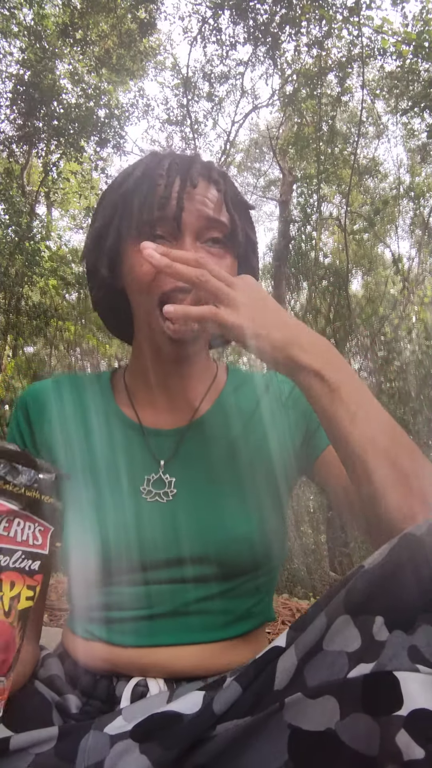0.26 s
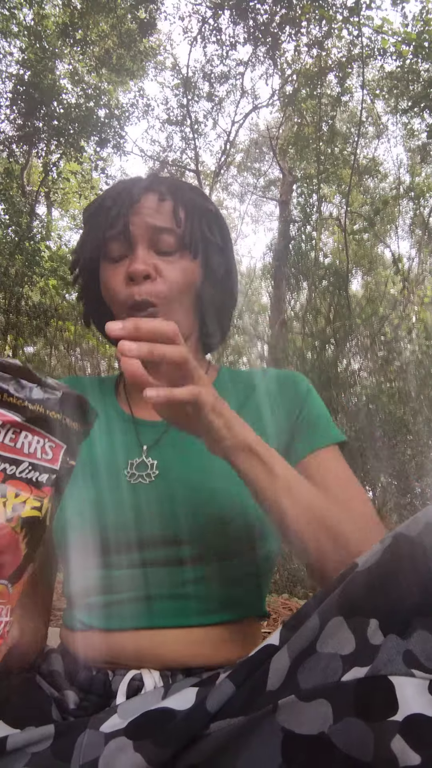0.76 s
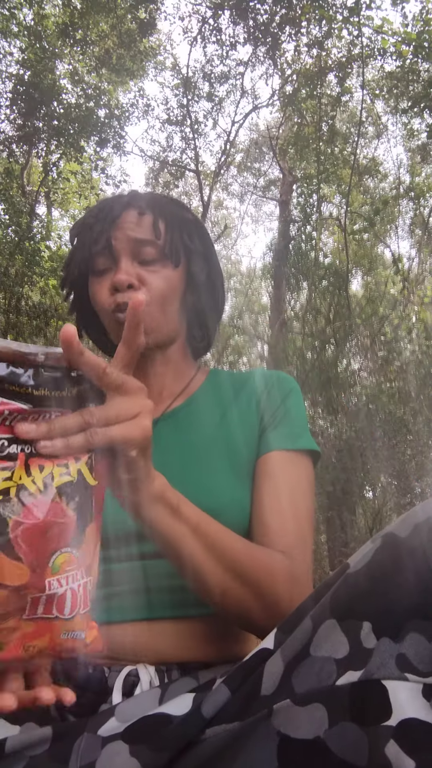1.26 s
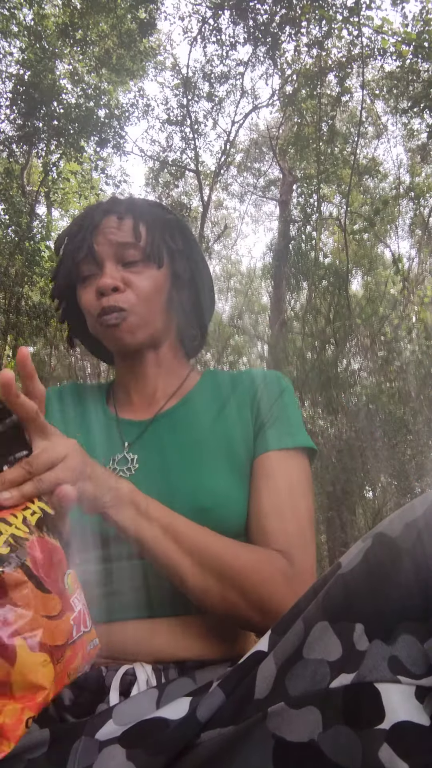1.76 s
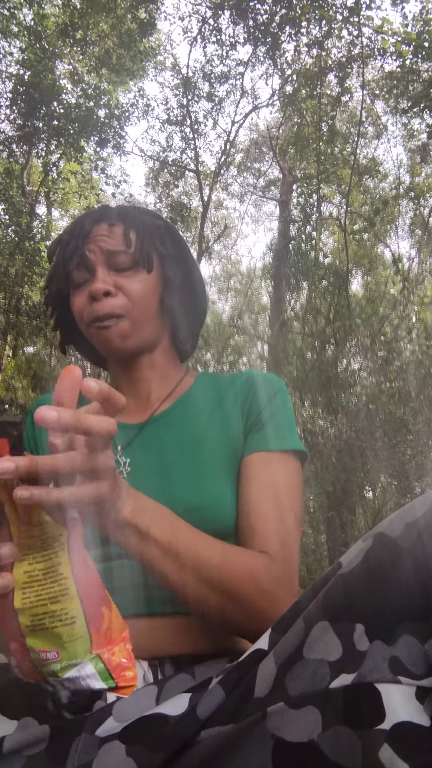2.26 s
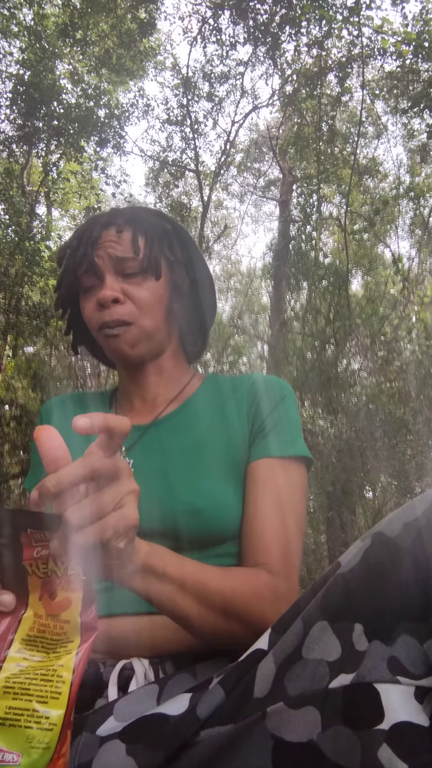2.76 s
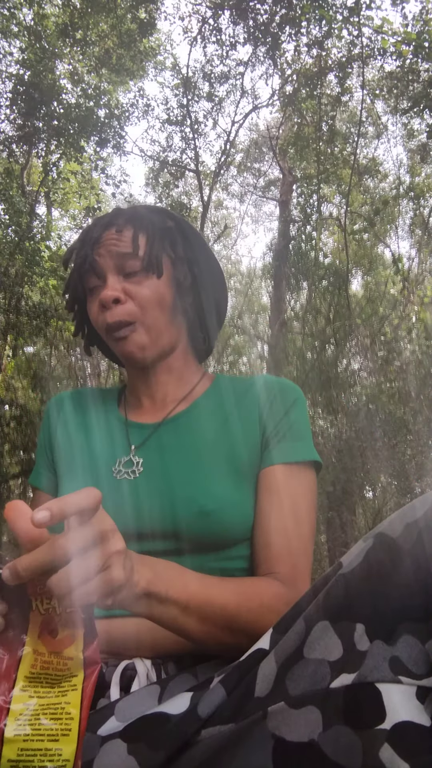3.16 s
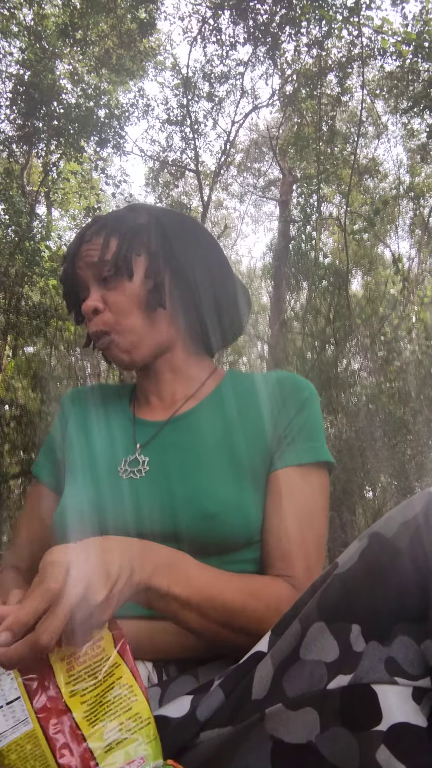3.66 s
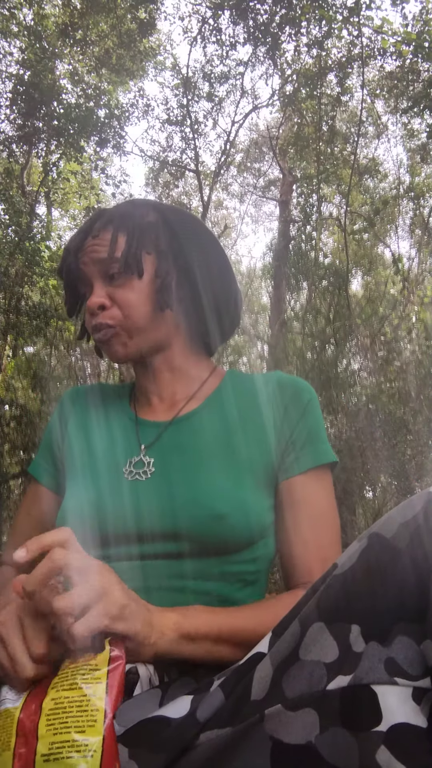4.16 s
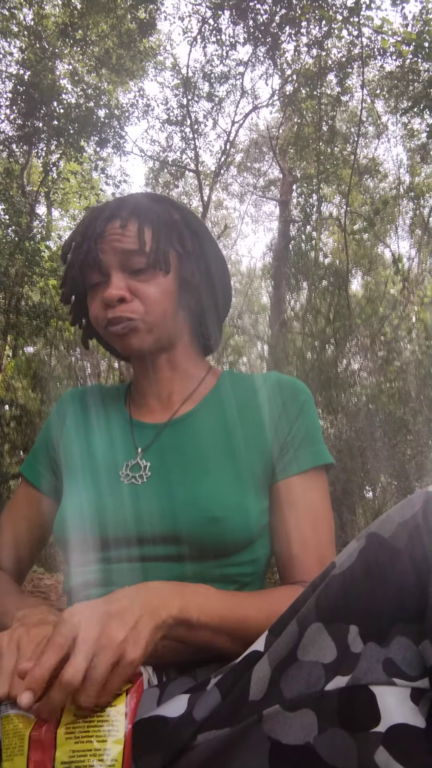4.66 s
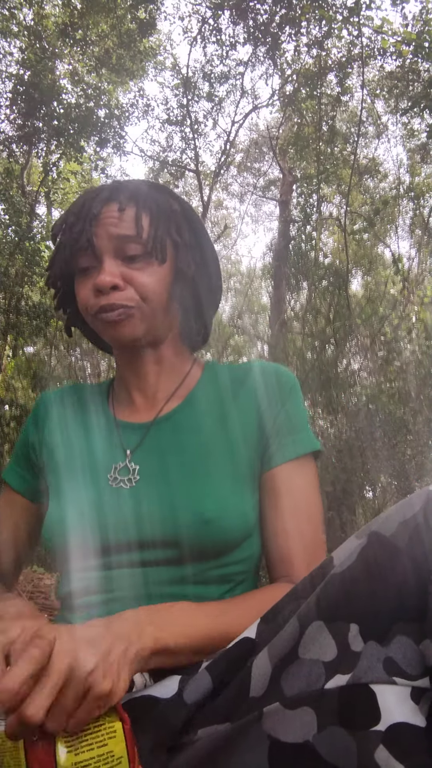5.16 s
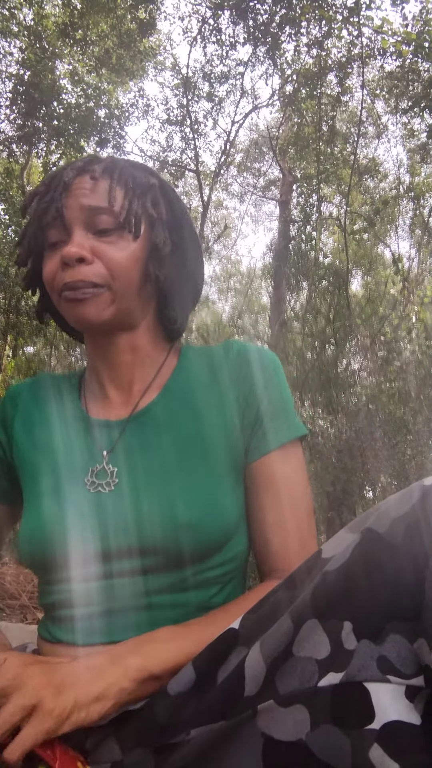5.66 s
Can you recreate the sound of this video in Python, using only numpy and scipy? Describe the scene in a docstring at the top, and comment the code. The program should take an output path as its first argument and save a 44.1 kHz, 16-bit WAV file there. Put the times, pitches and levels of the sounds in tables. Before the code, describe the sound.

A quiet wood with faint low road rumble, a soft hum and an even, dull murmur. From 0 s a far engine drones on a low, wavering tone, dipping and swelling; barely audible ticks come near the start and at 0.65 s. At about 1 s a thin foil snack bag close to the stereo phone begins to stir, and from 1.2 s it crackles sharply: bright snaps with short papery rings over many tiny crinkles. Bursts come irregularly, strong around 1.2-1.4 and 1.6-2.15 s, lighter around 2.2-2.5 s. The engine slides down in pitch, thins near 3 s and is gone by about 3.4 s. Crackling is thick and loud from 3.2 to 4.4 s, brightest around 3.7-4.0, with dull puffs of squeezed air. More puffs and snaps follow to 5.2 s, then somewhat sparser, softer rustling until the cut at about 5.9 s, the bag drifting slightly from right to left.

```python
"""Rummaging in a foil snack bag

A hand turns and rummages in a thin foil snack bag, close to a two-port phone in a wood.
Creases snap as short noise bursts with a treble tick and a panel ring, over many small crinkles;
squeezes add dull puffs of air. Far off an engine, made of wavering sine tones, drones and slows,
over road rumble, hum and an even murmur of the wood, all three made of shaped noise."""
import sys
import numpy as np
from scipy.fft import rfft, irfft, next_fast_len
from scipy.io import wavfile
from scipy.ndimage import map_coordinates

SR = 44100
rng = np.random.default_rng(int(sys.argv[2]) if len(sys.argv) > 2 else 0)


def transcribe(signal):
    """Save signal, clipped to [-1, 1], as a 16-bit WAV file at the path in sys.argv[1]."""
    frames = np.atleast_2d(signal).T
    limited = np.clip(frames, -1, 1)
    pcm = np.round(limited * 32767).astype(np.int16)
    wavfile.write(sys.argv[1], SR, pcm)


N = 260250  # length of the scene in samples
SIZE = 1024  # length of one burst in samples

# The crease snaps that stand out.
# Each row: time in seconds, ring level in dB, ring pitch in Hz, treble level in dB.
SNAPS = [(0.034, -49.5, 3000, -65), (0.0936, -51, 3580, -73), (0.6406, -56, 950, -56.5),
         (0.6483, -55.5, 2090, -59), (0.6584, -54.5, 930, -60), (0.9842, -35.5, 2630, -42.5),
         (1.0843, -37, 950, -53), (1.156, -28.5, 2210, -41), (1.1669, -32, 2190, -43),
         (1.192, -17.5, 2100, -26), (1.2212, -23.5, 2050, -31), (1.2537, -19.5, 2560, -25.5),
         (1.266, -19, 2604, -20), (1.2759, -23.5, 1840, -29.5), (1.3215, -23, 2070, -29.5),
         (1.3326, -25.5, 2080, -34), (1.3537, -25, 930, -22.5), (1.3618, -24, 2010, -24.5),
         (1.4969, -24, 2070, -38), (1.5478, -22, 1830, -32), (1.6132, -25.5, 1120, -27),
         (1.6585, -26.5, 1370, -38), (1.727, -25.5, 2530, -33), (1.7637, -23, 1870, -23),
         (1.7807, -17, 2950, -21), (1.9027, -29.5, 1420, -28.5), (1.917, -20, 2060, -23),
         (1.9287, -21, 2820, -20.5), (1.9355, -34, 1490, -31.5), (2.0631, -39, 1830, -32.5),
         (2.0972, -31.5, 970, -30.5), (2.1157, -21, 1310, -29.5), (2.1262, -23, 1990, -21.5),
         (2.1362, -17, 2610, -17), (2.2228, -30, 2440, -40), (2.3056, -29.5, 1900, -43.5),
         (2.4588, -30, 2940, -47), (2.4903, -31, 1870, -33), (2.518, -28.5, 2080, -33),
         (2.5523, -35, 1930, -32), (2.6013, -27.5, 1900, -26), (2.6153, -25.5, 1230, -24.5),
         (2.686, -30, 2390, -26.5), (2.698, -29.5, 3460, -29), (2.7685, -25, 970, -20),
         (2.802, -24, 2750, -25), (2.8237, -31, 2350, -27.5), (2.8359, -31, 3790, -26),
         (2.8467, -27.5, 1290, -29), (2.8882, -29.5, 1370, -35), (2.9261, -25, 2860, -31),
         (2.9508, -27.5, 1340, -33), (2.9777, -34, 2770, -37.5), (3.043, -35.5, 2230, -38),
         (3.173, -22.5, 2700, -25.5), (3.2137, -22.5, 1200, -33), (3.238, -20, 2930, -28.5),
         (3.2653, -24.5, 1290, -24.5), (3.2968, -22.5, 2630, -24), (3.377, -19.5, 2720, -21),
         (3.4153, -24.5, 2930, -32.5), (3.5672, -29, 1240, -34.5), (3.6504, -22.5, 1290, -27),
         (3.6607, -21.5, 1450, -23.5), (3.69, -19, 2370, -24), (3.7046, -28, 3400, -17),
         (3.7149, -20, 2610, -23), (3.7365, -39, 1720, -25), (3.8089, -19, 2960, -15.5),
         (3.8274, -22, 2840, -24), (3.8584, -24.5, 2370, -21.5), (3.8722, -22.5, 1410, -23.5),
         (3.9003, -35, 2860, -48), (3.92, -31, 1770, -19), (3.9306, -21.5, 2770, -20.5),
         (3.9408, -31, 1880, -25), (3.957, -26, 3510, -30), (3.9956, -21.5, 890, -14.5),
         (4.008, -16, 1520, -15), (4.0265, -22, 1450, -20.5), (4.1152, -28.5, 1630, -34),
         (4.1288, -33, 2640, -28), (4.183, -33, 2790, -33), (4.2163, -34, 1750, -29.5),
         (4.2382, -36, 1250, -28), (4.2681, -20.5, 2200, -20), (4.2882, -25, 2430, -23),
         (4.323, -29, 1510, -23.5), (4.3412, -15.5, 1540, -15), (4.371, -25.5, 1470, -27),
         (4.3842, -25.5, 1430, -25), (4.452, -27.5, 1050, -31.5), (4.545, -24.5, 2450, -27.5),
         (4.5523, -23.5, 2360, -29), (4.5622, -24, 1300, -20), (4.5764, -21, 2170, -32),
         (4.6357, -25.5, 2730, -22), (4.6476, -31, 1820, -20), (4.668, -31, 3040, -25.5),
         (4.7385, -22.5, 2800, -31), (4.7602, -23.5, 920, -25.5), (4.7933, -25.5, 980, -27),
         (4.8008, -27.5, 2990, -24), (4.8263, -19, 1720, -21), (4.849, -24, 1670, -25.5),
         (4.859, -33, 900, -27), (4.8957, -32.5, 920, -31.5), (4.913, -28.5, 1900, -37),
         (5.0077, -33.5, 2690, -21), (5.0271, -28.5, 1920, -26.5), (5.0437, -25, 930, -28),
         (5.062, -34, 2420, -32.5), (5.0938, -29, 1310, -31.5), (5.1673, -29.5, 1690, -34),
         (5.178, -31, 2680, -28.5), (5.2046, -22, 1720, -22.5), (5.216, -26.5, 1480, -25),
         (5.237, -32, 1320, -36.5), (5.276, -28, 2820, -30.5), (5.3119, -28, 1640, -27.5),
         (5.328, -30.5, 1520, -32), (5.456, -31.5, 1760, -44), (5.5454, -31.5, 1880, -33.5),
         (5.5893, -32, 1750, -39), (5.6051, -29, 2610, -26), (5.6168, -34, 1030, -32),
         (5.6318, -35.5, 1430, -34), (5.7728, -27, 1690, -26), (5.8224, -28, 1390, -29.5),
         (5.8632, -27.5, 2760, -25), (5.8717, -32, 1390, -31)]
# Where the bag is and how it faces. Each row: time in seconds, usual lag of the left port in seconds,
# top-octave lift in dB, then the usual crinkle treble and bag-air levels in dB at a firm grip.
PLACE = [(1, .00012, 0.5, -52.5, -55.5), (2.2, .00003, 1, -50, -57), (3, -.00006, -3.5, -47.5, -57.5),
         (3.7, -.0001, -1, -46.5, -58), (4.2, -.00011, -3.5, -42, -53.5), (4.8, -.00013, -7, -45.5, -51),
         (5.9, -.00015, -1.5, -42, -53.5)]


def amp(db):
    """Turn dB into gain."""
    return 10 ** (np.asarray(db) / 20)


def unit(x):
    """Scale x to an rms of 1."""
    return x / np.sqrt(np.mean(x ** 2) + 1e-20)


def along(points, hz):
    """Read a curve of (Hz, value) points on a log frequency axis."""
    point_hz, value = np.transpose(points)
    return np.interp(np.log(hz + 1), np.log(point_hz + 1), value)


def curves(rows, times=None):
    """Read each column after the time, at every sample or at given times."""
    row_times, *columns = np.transpose(rows)
    if times is None:
        times = np.arange(N) / SR
    return [np.interp(times, row_times, column) for column in columns]


def wobble(rate):
    """A smooth random curve through `rate` random points a second."""
    knots = rng.standard_normal(int(N * rate / SR) + 4)
    return map_coordinates(knots, [np.arange(N) * rate / SR])


def filtered(x, response):
    """Multiply the spectrum of x by a response that depends on frequency."""
    m = next_fast_len(N + SR // 2)
    hz = np.fft.rfftfreq(m, 1 / SR)
    return irfft(rfft(x, m) * response(hz), m)[..., :N]


def rush(spectrum):
    """Stereo noise of rms 1: left and right are alike in the bass and mostly unlike higher up."""
    # Each row: frequency in Hz, left-right likeness (1 is the same, 0 is unrelated).
    alike = [(60, 1), (180, 1), (550, 0.43), (1650, 0.049), (4970, 0.27), (15000, -0.6)]

    def response(hz):
        turn = np.arccos(np.clip(along(alike, hz), -1, 1)) / 2
        return amp(along(spectrum, hz)) * [np.cos(turn), np.sin(turn)]

    mid, side = filtered(rng.standard_normal((2, N)), response)
    return unit(np.array([mid + side, mid - side]))


def road():
    """Far traffic rumbles and hums with slow level wobbles; the wood murmurs evenly."""
    # Traffic levels. Each row: time in seconds, usual rumble level in dB, usual hum level in dB.
    traffic = [(0, -46.5, -47.5), (1, -45, -50.5), (2, -47, -48.5), (3.3, -43.5, -45.5), (4.5, -42.5, -49),
               (5.9, -44.5, -50)]
    # Noise colours of rumble, hum and wood. Each row: frequency in Hz, relative level in dB per Hz.
    rumble_colour = [(20, -41), (40, -13), (60, 7), (85, 12.5), (120, 12.5), (160, 2.5), (250, -43.5)]
    hum_colour = [(90, -11), (150, 10.5), (200, 4), (320, 2.5), (450, -51)]
    wood_colour = [(210, -24.5), (350, 0.5), (650, -5), (1250, -10.5), (2500, -22.5), (3500, -32.5),
                   (5000, -42), (9000, -52.5), (16000, -49)]
    rumble_db, hum_db = curves(traffic)
    rumble = amp(rumble_db + 0.83 * wobble(3.4)) * rush(rumble_colour)
    hum = amp(hum_db + 1.5 * wobble(3.11)) * rush(hum_colour)
    return rumble + hum + amp(-54.0) * rush(wood_colour)


def engine():
    """The firing tone swells and fades on its way through the trees; weak orders lie above it."""
    # Engine speed. Each row: time in seconds, firing rate in Hz.
    speed = [(0, 128.3), (.7, 120.5), (1.1, 123.9), (2.05, 123.5), (2.3, 116.9), (2.75, 110.6), (3, 100),
             (3.4, 104.2)]
    # Loudness of the firing tone. Each row: time in seconds, usual level in dB.
    loudness = [(0, -27.5), (.3, -28.5), (.7, -34.5), (1, -38), (1.2, -44.5), (1.55, -37), (2, -36.5),
                (2.3, -33.5), (2.75, -34), (2.95, -45), (3.15, -39.5), (3.4, -62)]
    # The tone dips briefly. Each row: time in seconds, depth in dB, width in seconds.
    dips = [(.355, 17, 0.023), (.61, 7, 0.05), (0.811, 32, .03), (1.15, 13, 0.075), (1.65, 8, .03),
            (1.78, 7, 0.034), (2.14, 12, .05), (2.29, 9, .02), (2.83, 18, 0.018)]
    # Weaker tones. Each row: multiple of the firing rate, usual level in dB.
    orders = [(1.5, -57), (2, -60), (2.5, -59)]
    t = np.arange(N) / SR
    firing_hz, = curves(speed)
    level_db, = curves(loudness)
    for dip_time, depth_db, width in dips:
        level_db = level_db - depth_db * np.exp(-((t - dip_time) / width) ** 2)
    phase = 2 * np.pi * np.cumsum(firing_hz) / SR
    tone = amp(level_db + 1.5 * wobble(24.89)) * np.sin(phase + 0.35 * wobble(30))
    for multiple, order_db in orders:
        tone += amp(order_db + 2.8 * wobble(8)) * np.sin(multiple * phase + 1.35 * wobble(14))
    # fade to silence over 0.25 s around the last level row
    fade_out = np.clip((loudness[-1][0] + 0.23 - t) / 0.25, 0, 1)
    left_right = amp([[.45], [-.45]])
    return np.sqrt(2) * fade_out * tone * left_right


def bursts(times, db, pan_db, colour_db, t60, unlike, travel=0.0537):
    """Short stereo noise bursts that fade by 60 dB in t60 seconds; `unlike` is the unshared part."""
    t, hz = np.arange(SIZE // 2) / SR, np.fft.rfftfreq(SIZE, 1 / SR)
    noise = rng.standard_normal((len(times), 3, len(t)))  # one shared, one left, one right
    pair = np.sqrt(1 - unlike) * noise[:, :1] + np.sqrt(unlike) * noise[:, 1:]
    rise = (1 - np.exp(-t / (0.11 * t60))) ** 2
    shape = amp(-60 * t / t60) * rise
    # bending waves in the foil run at a speed rising with the root of frequency:
    # the treble arrives first, each frequency after travel / sqrt(hz) seconds
    bend = 4 * np.pi * travel * np.sqrt(hz)
    # each burst sits elsewhere on the bag, so its lag between the ports differs a little
    left_lag = curves(PLACE, times)[0] + .000025 * rng.standard_normal(len(times))
    # 64 spare samples keep every delay positive; they are taken off again below
    delay = np.multiply.outer(left_lag, [.5, -.5])[..., None] + 64 / SR
    turn = np.exp(-1j * (bend + 2 * np.pi * hz * delay))
    sound = irfft(rfft(pair * shape, SIZE) * amp(colour_db)[..., None, :] * turn, SIZE)
    # bring all bursts to the same energy, then set level and left-right balance
    energy = np.sum(sound ** 2, axis=(1, 2))
    sound /= np.sqrt(energy / (t60 * SR / 2))[:, None, None]
    sound *= amp(db[:, None] + np.multiply.outer(pan_db, [.5, -.5]))[..., None]
    # add every burst into the scene at its own time
    start = np.round(times * SR).astype(int)[:, None] - 64
    place = (start + np.arange(SIZE)).clip(0).ravel()
    return np.array([np.bincount(place, sound[:, ear].ravel(), N + SIZE)[:N] for ear in range(2)])


def puffs(times, db):
    """Short dull pushes of the air in the bag, 2 dB stronger on the left."""
    # Colour of the bag's air. Each row: frequency in Hz, relative level in dB per Hz.
    air_colour = [(150, -3), (300, -3.5), (480, 6), (750, -4.5), (1200, -61)]
    colour_db = along(air_colour, np.fft.rfftfreq(SIZE, 1 / SR))
    return bursts(times, db, 2 + 0 * times, colour_db, t60=0.049, unlike=0.053)


def creases(times, ring_db, ring_hz, treble_db):
    """A buckling crease gives a treble tick and rings its foil panel, a little to one side or the other."""
    # Colours of the ring and of the tick. Each row: frequency in Hz, relative level in dB per Hz.
    foil_colour = [(410, -22), (700, -13), (963, -2.5), (1260, -3.5), (2910, -1), (3970, -9.5), (4500, -15),
                   (5850, -14), (9900, -120)]
    shine_colour = [(2350, -42), (4000, -3), (4700, 0.5), (7790, 3.5), (10800, -4), (13300, -0.5),
                    (15400, -10.5), (16000, 4.5), (16800, -34)]
    hz = np.fft.rfftfreq(SIZE, 1 / SR)
    pan_db = 0.5 + 3.5 * rng.standard_normal(len(times))
    # the panel adds a peak of 8 dB around its own pitch
    panel_db = 8 * np.exp(-(np.log((hz + 1) / ring_hz[:, None]) / 0.15) ** 2)
    # the way the bag faces lifts or dulls the top octave
    lift_db = np.multiply.outer(curves(PLACE, times)[1], np.clip(hz / 4000 - 2.2, 0, 1))
    # each crease is also duller or brighter by chance, in dB per octave above 4 kHz
    tilt_db = 4.4 * rng.standard_normal(len(times))
    lift_db += np.multiply.outer(tilt_db, np.log2(np.clip(hz, 4000, None) / 8000))
    ring_colour_db = along(foil_colour, hz) + panel_db
    tick_colour_db = along(shine_colour, hz) + lift_db
    ring = bursts(times, ring_db, pan_db, ring_colour_db, t60=0.0094, unlike=0.076)
    tick = bursts(times, treble_db, pan_db, tick_colour_db, t60=0.0058, unlike=.15)
    return ring + tick


def crinkle(count, over_db, spread_db):
    """Creases at random moments, with a puff at every second one; a firmer grip is louder and brighter."""
    # How hard the hand works the bag. Each row: time in seconds, effort as crinkle level in dB.
    hand = [(1.03, -64.5), (1.14, -55), (1.2, -39.5), (1.27, -36), (1.37, -36.5), (1.5, -54), (1.64, -35),
            (1.7, -47), (1.77, -39), (1.93, -35), (2.0, -45), (2.14, -31), (2.2, -50.5), (2.36, -51.5),
            (2.5, -42), (2.62, -38.5), (2.82, -38), (2.9, -55), (3.0, -42), (3.18, -45), (3.26, -34),
            (3.34, -49), (3.42, -40), (3.52, -49), (3.69, -37), (3.77, -43.5), (3.84, -32), (4.04, -38),
            (4.15, -45), (4.35, -36), (4.45, -38), (4.51, -49), (4.6, -36), (4.83, -41.5), (4.93, -54),
            (5.02, -32.5), (5.22, -39), (5.4, -45.5), (5.6, -44), (5.69, -52), (5.8, -39), (5.9, -48.5)]
    # Usual ring of the panels under the fingers. Each row: time in seconds, pitch in Hz.
    panel = [(1, 1700), (3, 1890), (4, 2160), (5.9, 2100)]
    firm_db = -40.5  # effort of a firm grip
    treble_grows, air_grows = 1.54, 0.58  # dB for each dB of effort above a firm grip
    times = np.sort(rng.uniform(hand[0][0], N / SR, count))
    chance = rng.standard_normal((count, 4))
    size_db = over_db + spread_db * chance[:, 1]
    effort_db, = curves(hand, times)
    grip_db = effort_db - firm_db
    shine_db, air_db = curves(PLACE, times)[2:]
    ring_hz = curves(panel, times)[0] * np.exp(0.44 * chance[:, 0])
    treble_db = shine_db + treble_grows * grip_db + size_db + 3.06 * chance[:, 2]
    puff_db = air_db + 0.96 * over_db + air_grows * grip_db + 3 * chance[:, 3]
    small = creases(times, effort_db + size_db, ring_hz, treble_db)
    return small + puffs(times[::2], puff_db[::2])


def neighbours(count=2):
    """A snap shifts the strain in the foil: smaller creases give way just before and after it."""
    snap_time, ring_db, ring_hz, treble_db = np.repeat(SNAPS, count, axis=0).T
    chance = rng.standard_normal((len(snap_time), 4))
    wait = .002 + .003 * chance[:, 0]  # seconds; below zero comes before the snap
    fade_db = -11 - 900 * abs(wait)  # weaker the further away in time
    near_ring_db = ring_db + fade_db + 3.94 * chance[:, 1]
    near_hz = ring_hz * np.exp(0.4 * chance[:, 2])
    near_treble_db = treble_db + fade_db + 4.0 + 2.7 * chance[:, 3]
    return creases(snap_time + wait, near_ring_db, near_hz, near_treble_db)


def snaps():
    """The single creases that stand out, and the squeezes that push the air in the bag."""
    # Squeezes that puff the air. Each row: time in seconds, level in dB.
    squeezes = [(1.275, -35), (1.354, -39), (2.553, -45.5), (3.794, -38.5), (3.83, -40), (3.997, -32.5),
                (4.031, -40.5), (4.1, -38), (4.342, -37.5), (4.454, -42), (4.552, -35.5), (4.672, -37.5),
                (4.827, -30.5), (5.043, -34.5), (5.205, -34), (5.568, -39.5), (5.746, -36)]
    return creases(*np.transpose(SNAPS)) + puffs(*np.transpose(squeezes))


def scene():
    """The traffic far off, the bag close by."""
    far = road() + engine()
    fine = crinkle(count=2600, over_db=-3.0, spread_db=3)
    coarse = crinkle(count=380, over_db=7, spread_db=2.5)
    return far + fine + coarse + neighbours() + snaps()


def record(dry):
    """The ports differ a little in phase, mostly in the bass; the top fades from 15 kHz, silent from 16.7 kHz."""
    # Phase between the ports. Each row: frequency in Hz, lead of the left port in radians.
    port_lead = [(40, -0.15), (200, -0.3), (600, 0.51), (1300, 0.18), (2500, -0.057), (5000, -0.0034)]
    top_hz = 16700  # nothing is kept from here up

    def response(hz):
        ports = np.exp(1j * np.multiply.outer([.5, -.5], along(port_lead, hz)))
        fade_db = np.interp(hz, [15000, 15800, 16100], [0, -3, -16])
        return ports * amp(fade_db) * (hz < top_hz)

    return filtered(dry, response)


dry = scene()
out = record(dry)
transcribe(out)
```